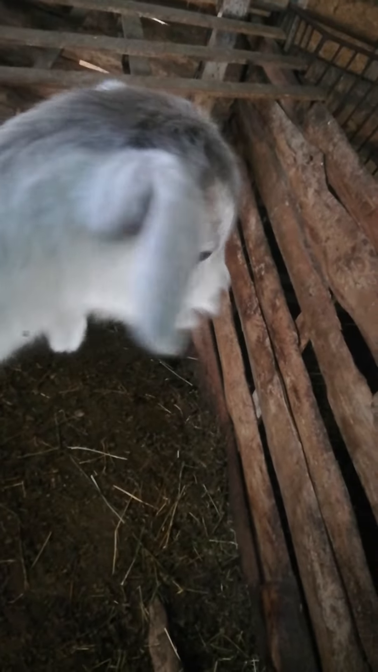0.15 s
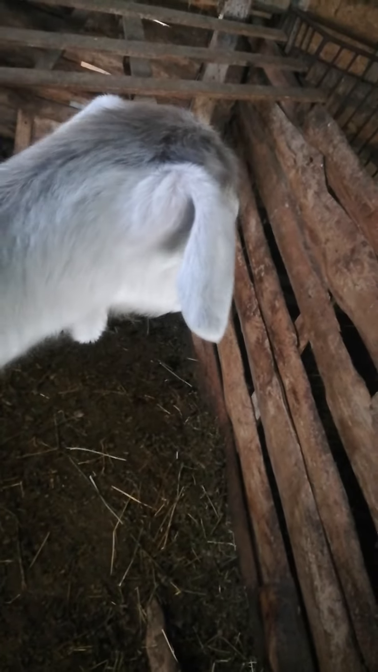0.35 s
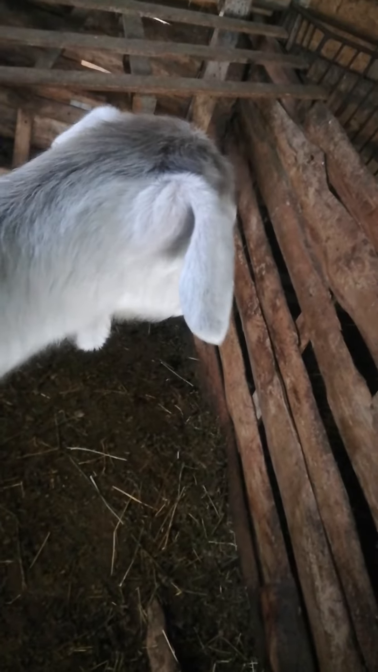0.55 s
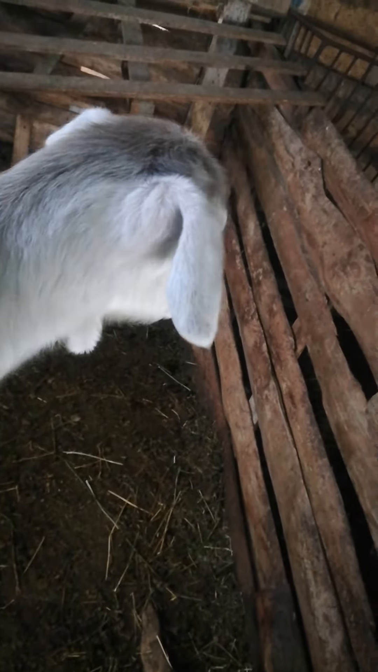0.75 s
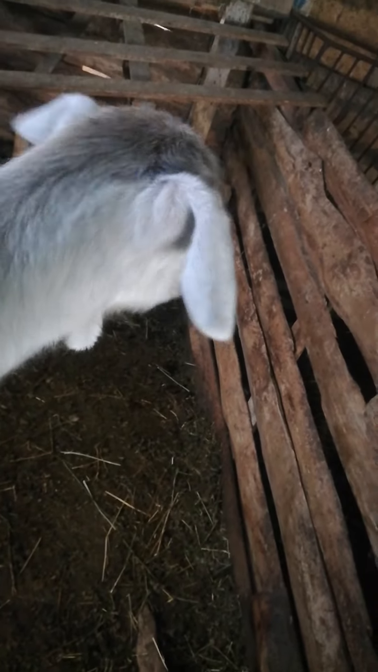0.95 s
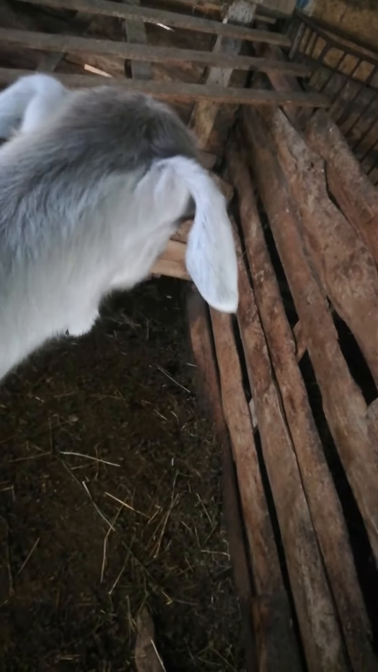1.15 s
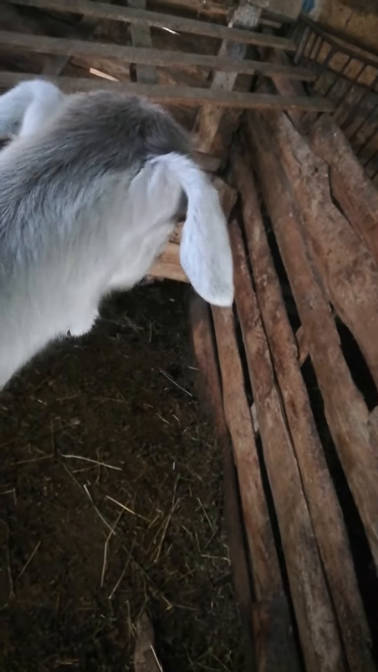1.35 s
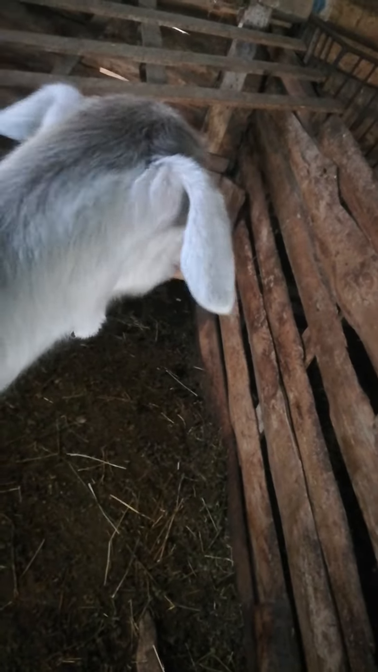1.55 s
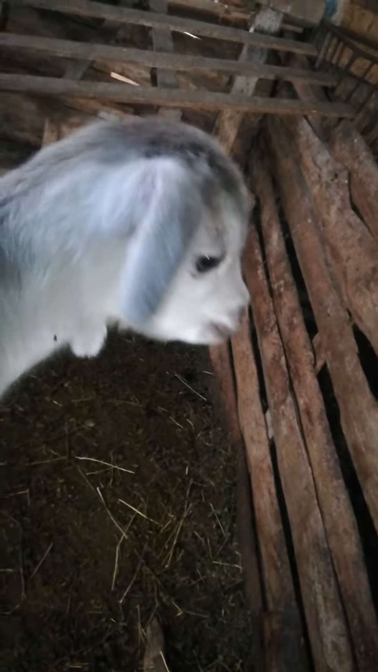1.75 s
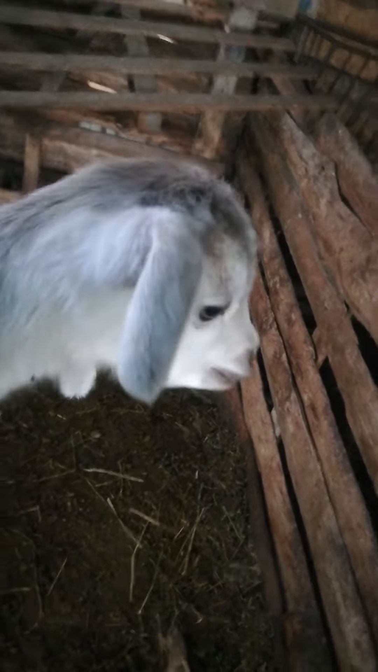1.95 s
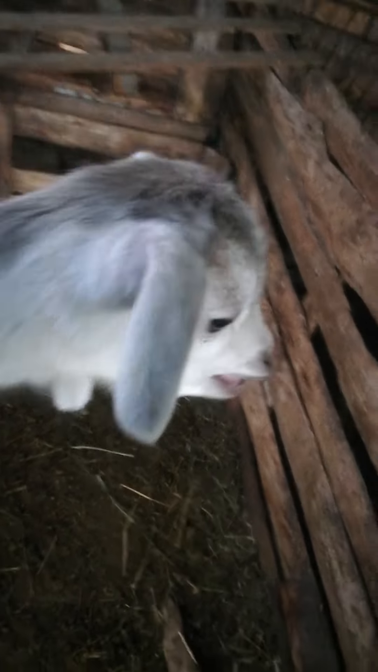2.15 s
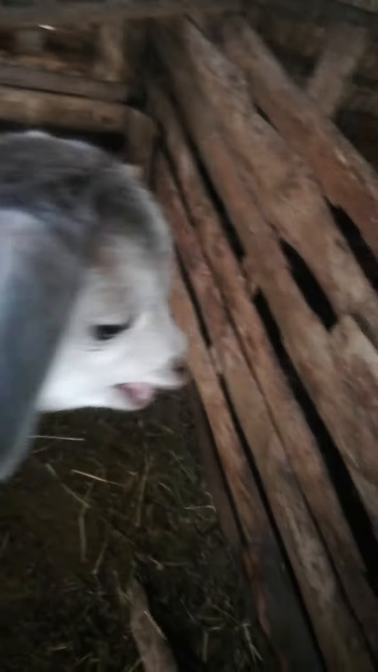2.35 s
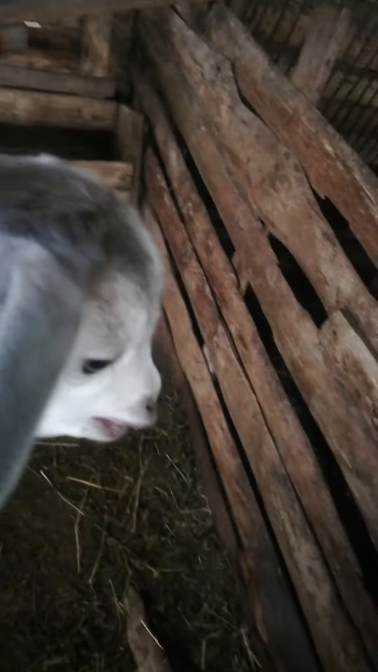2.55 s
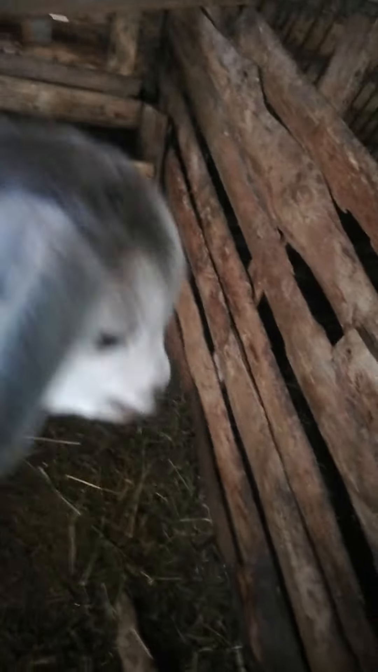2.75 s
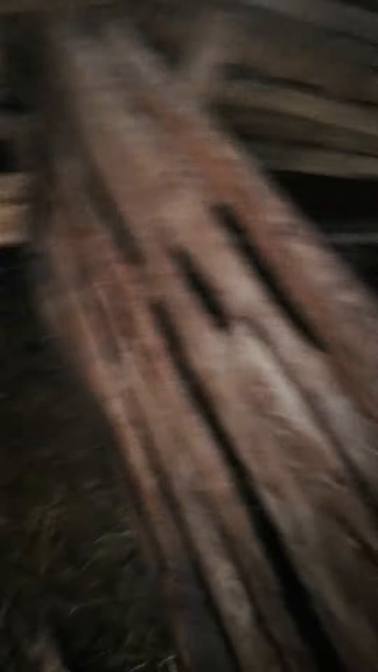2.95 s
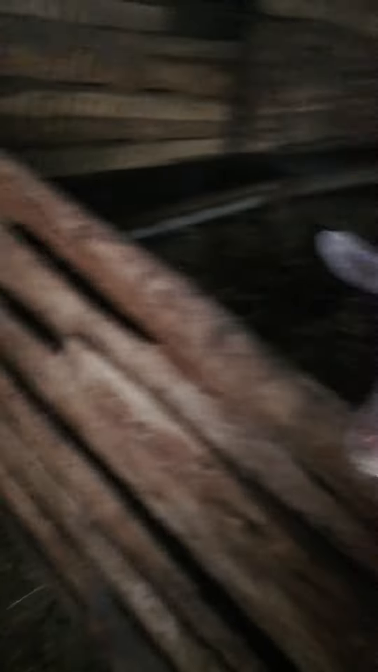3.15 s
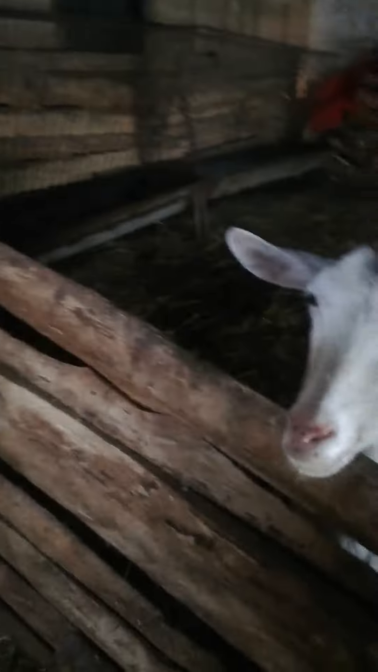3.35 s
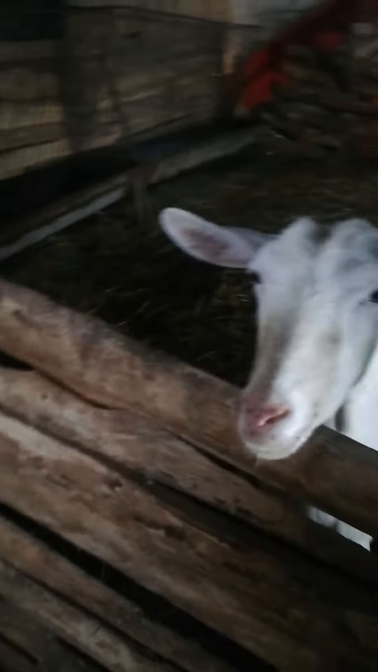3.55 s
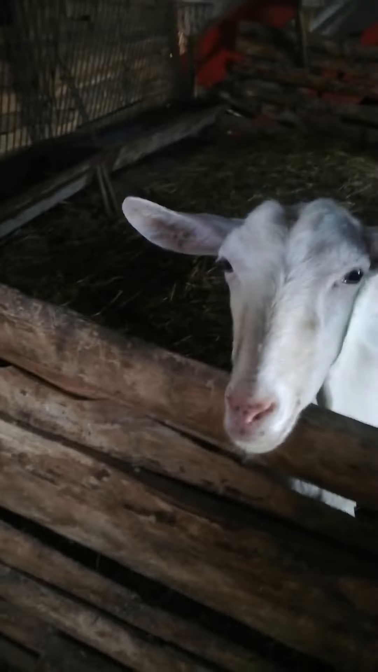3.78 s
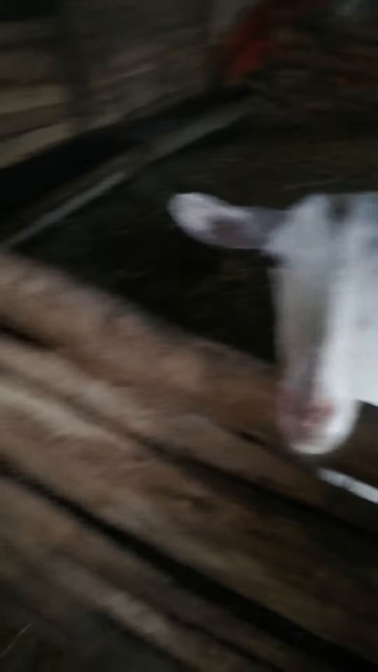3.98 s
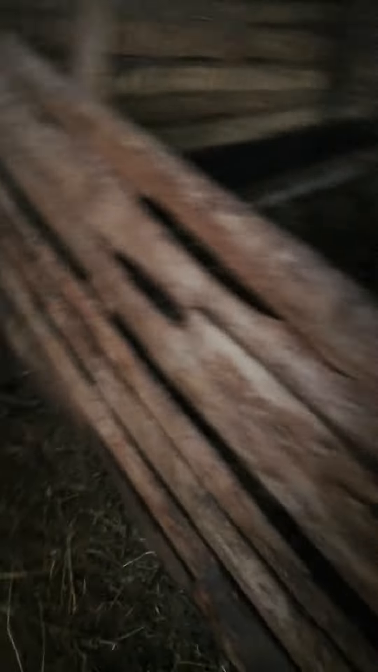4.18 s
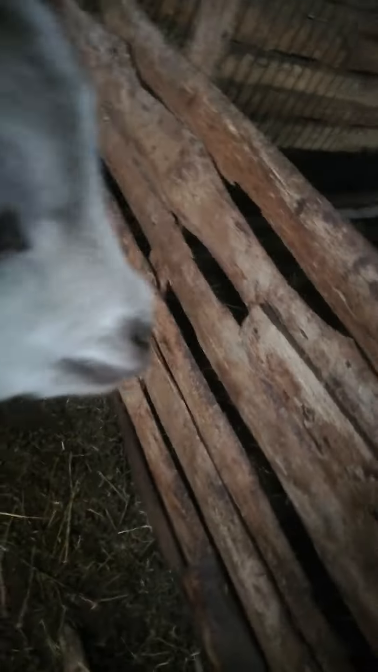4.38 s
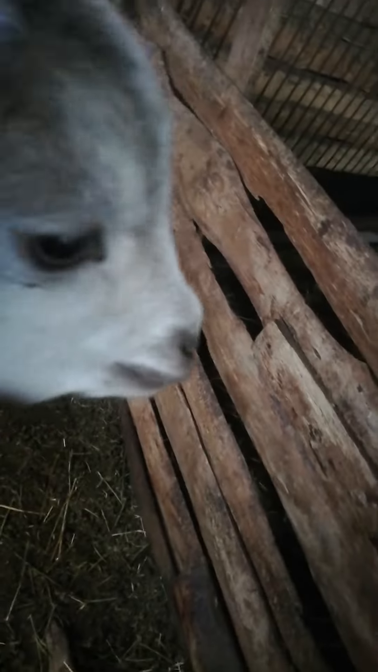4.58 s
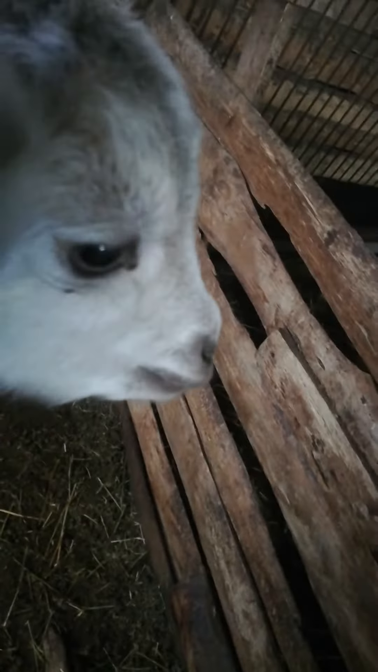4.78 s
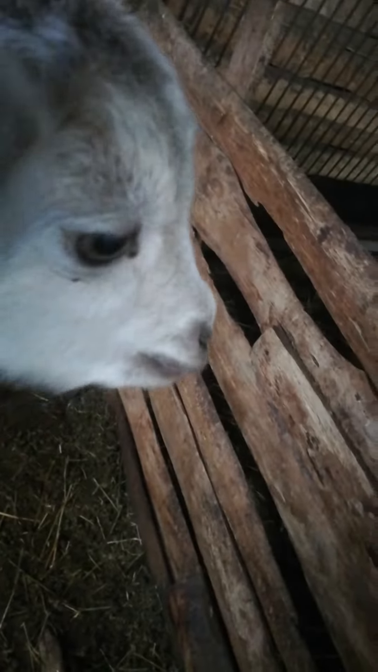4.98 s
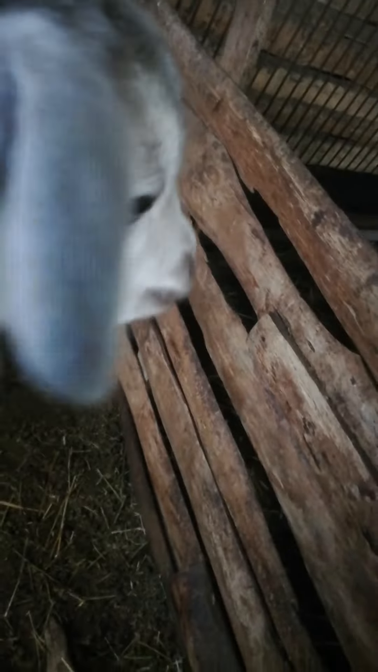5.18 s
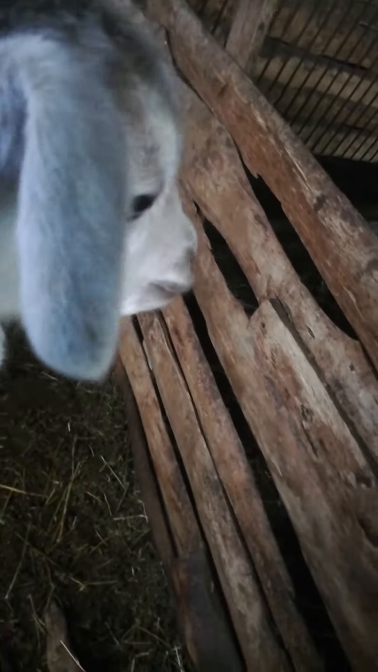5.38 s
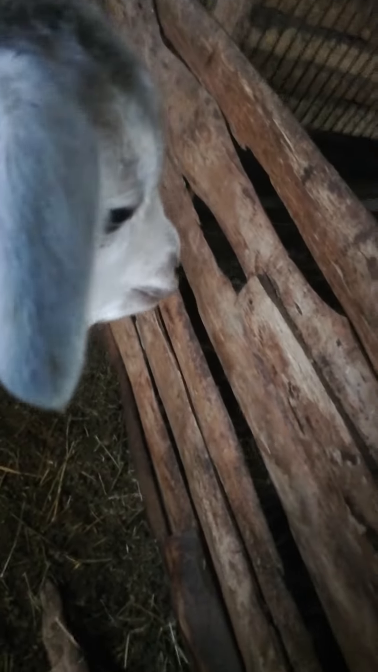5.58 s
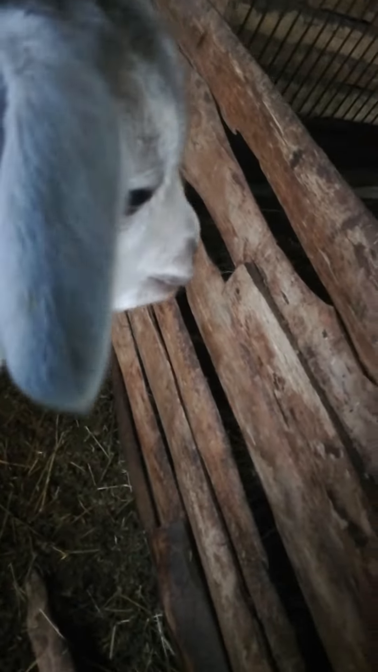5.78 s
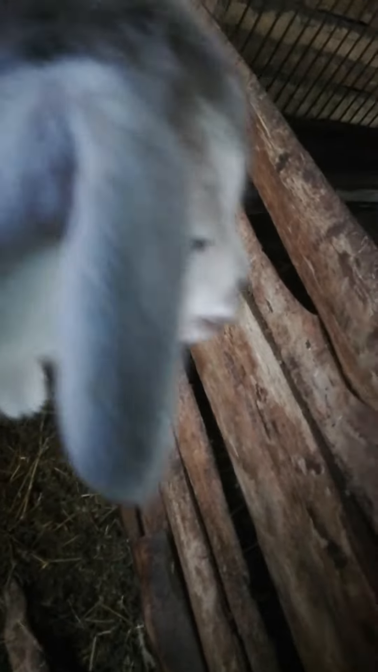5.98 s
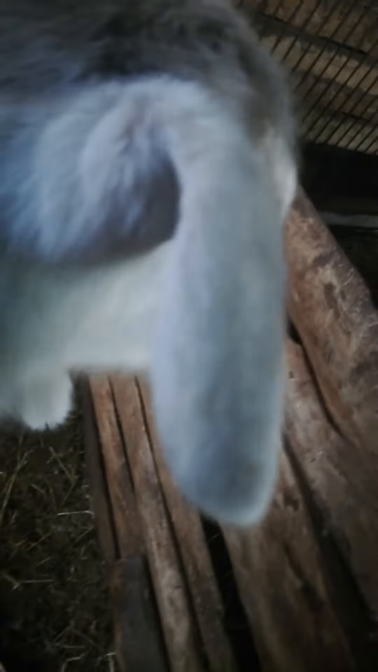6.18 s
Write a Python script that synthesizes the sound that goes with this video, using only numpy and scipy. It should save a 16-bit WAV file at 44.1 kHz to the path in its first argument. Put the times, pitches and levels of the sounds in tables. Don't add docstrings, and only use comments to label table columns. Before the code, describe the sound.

In a wooden pen with a short diffuse echo, picked up by a close stereo microphone, a goat kid starts at once with four quick quavers, 0 to 0.5 s, a medium-high trembling bleat. A soft breath fades after it. From 1.2 to 1.8 s a doe farther away replies with six low, nasal, nearly closed-mouth pulses, quiet and humming, with light straw rustle. At 1.8 to 2.5 s the kid bleats again, louder, brighter and wider open, its last quaver dying away near 2.6 s. A hoof knocks wood, and the doe murmurs four pulses until about 3.05 s amid crisp straw snaps. The kid's third bright bleat runs from 3.25 to 3.95 s. Afterwards come fading breath, gentle air stirs, sparse straw ticks and a faint double hoof step at 6.2 s, over soft hiss and low outdoor rumble.

```python
import sys
import numpy as np
from scipy import signal
from scipy.fft import rfft, irfft
from scipy.io import wavfile
from scipy.ndimage import uniform_filter1d

SR = 44100
rng = np.random.default_rng(int(sys.argv[2]) if len(sys.argv) > 2 else 0)


def master(y):
    cut = np.clip(np.atleast_2d(y).T, -1, 1)
    pcm = np.round(cut * 32767)
    wavfile.write(sys.argv[1], SR, pcm.astype(np.int16))


def natural_amplitude(level_db):
    exponent = np.asarray(level_db, float) / 20
    return 10 ** exponent


N = 274680

# (start [s], rise [s], top pitch [Hz], level [dB], mouth opening [0-1])
DOE_CALLS = [(1.195, 0.044, 206.7, -50, 0.3), (1.32, 0.031, 223.2, -42.5, 0.13),
             (1.435, 0.035, 228.5, -44, 0.095), (1.548, 0.031, 232.7, -42, 0.05),
             (1.658, 0.038, 224.8, -44.5, 0.084), (1.758, 0.035, 216, -54.5, 0.17),
             (2.68, 0.036, 189.9, -44.5, 0.43), (2.8, 0.024, 205.7, -39.5, 0.28),
             (2.905, 0.031, 203, -40, 0.4), (3.003, 0.037, 185.6, -42.5, 0.28),
             (3.15, 0.0057, 191.3, -68.5, 0.37), (3.455, 0.019, 223.8, -61.5, 0.28)]


def at_hz(points, hz):
    point_hz, point_db = np.array(points).T
    return np.interp(np.log(hz), np.log(point_hz), point_db)


def rms_one(x):
    return x / np.sqrt(np.mean(x ** 2) + 1e-20)


def drift(rate):
    r = np.exp(-80 * np.pi * rate / SR)
    white = rng.standard_normal(N // 40 + 2002)
    slow = signal.lfilter([1], [1, -2 * r, r * r], white)[2000:]
    return np.interp(np.arange(N) / 40, np.arange(len(slow)), rms_one(slow))


def band(x, low_hz, high_hz, order=2):
    return signal.sosfilt(signal.butter(order, [low_hz, high_hz], "band", fs=SR, output="sos"), x)


def resonate(x, modes):
    out = 0
    for k, (hz, width, db) in enumerate(modes):
        r = np.exp(-np.pi * width / SR)
        poles = [1, -2 * r * np.cos(2 * np.pi * hz / SR), r * r]
        zeros = [(1 - r * r) / 2, 0, (r * r - 1) / 2]
        out = out + (-1) ** k * natural_amplitude(db) * signal.lfilter(zeros, poles, x)
    return out


def formants(x, modes):
    out = 0
    for k, (hz, width, db) in enumerate(modes):
        mode = [(hz, 1.5 * width, 0)]
        out = out + (-1) ** k * natural_amplitude(db) * resonate(resonate(x, mode), mode)
    return out


def swells(rows):
    t = np.arange(N) / SR
    gain = 0
    for s, rise, fall, db in rows:
        away = np.maximum((s - t) / max(rise, .005), (t - s) / max(fall, .005))
        gain = gain + natural_amplitude(db - 20 * away)
    return gain


def row_at(rows, s):
    return max(np.searchsorted([row[0] for row in rows], s) - 1, 0)


def banded_noise(spectrum, patchy_db):
    # (frequency [Hz], correlation [-1 to 1])
    likeness = [(25, .999), (60, .99), (130, .96), (290, .75), (640, 0), (15000, 0)]
    out, edges = 0, 16 * 2 ** np.arange(0, 10.1, .5)
    white = rng.standard_normal((2, 2, N))
    for k, (low, high) in enumerate(zip(edges, edges[1:])):
        hz = np.sqrt(low * high)
        flicker = drift(2.7)
        if spectrum[0][0] <= hz <= spectrum[-1][0]:
            mid, side = band(white[k % 2], low, high)
            alike = np.clip(at_hz(likeness, hz), -1, 1)
            gain = natural_amplitude(at_hz(spectrum, hz) + patchy_db * flicker)
            out = out + gain * (np.sqrt(1 + alike) * mid + np.sqrt(1 - alike) * side * [[1], [-1]])
    return rms_one(out)


def outdoor_rumble():
    # (frequency [Hz], density [dB per Hz])
    rumble_spectrum = [(12, -39.5), (20, -13), (45, 3), (80, -8.5), (229, -9), (338, -19.5), (400, -34.5),
                       (1100, -110)]
    return natural_amplitude(-58) * banded_noise(rumble_spectrum, patchy_db=3.0)


def air_hiss():
    # (frequency [Hz], density [dB per Hz])
    hiss_spectrum = [(300, -12), (700, 7), (2000, 0.5), (5000, 0), (9000, -4.5), (13000, 1), (16000, -34)]
    return natural_amplitude(-66) * banded_noise(hiss_spectrum, patchy_db=1.85)


def air_swish():
    # (peak [s], rise [s], fall [s], peak level [dB])
    swish_rows = [
        (.52, 0.035, 0.34, -60.5),
        (1.124, .04, 0.033, -71),
        (3.28, 0.28, 0.1, -60),
        (3.98, 0.057, 0.32, -63),
        (4.45, 0.042, 0.043, -70),
        (5.15, 0.37, 0.65, -62),
        (5.81, 0.083, 0.054, -69.5),
        (5.95, .07, .15, -70),
        (6.22, 0.048, .1, -65),
    ]
    quaver_puffs = []
    for s, rise, hz, db, opening in DOE_CALLS:
        quaver_puffs.append((s + rise / 2, 0.0087, 0.093, db - 7.5))
    noise = band(rng.standard_normal((2, N)), 530, 2000, order=1)
    return rms_one(noise) * swells(swish_rows + quaver_puffs) * natural_amplitude(2)


def straw_rustle():
    # (peak [s], rise [s], fall [s], peak level [dB])
    rustle_rows = [(1.34, 0.021, 0.096, -58), (1.76, 0.1, .15, -58), (1.55, .25, .25, -65),
                   (2.7, .08, 0.18, -55.5), (2.958, .05, 0.017, -51), (3.044, 0.088, 0.036, -54.5),
                   (3.28, 0.41, 0.59, -75), (4.05, .15, 0.26, -63), (4.52, 0.016, 0.041, -75),
                   (4.84, 0.13, 0.11, -77), (5.2, 0.25, .3, -75), (5.58, 0.51, 0.56, -65.5),
                   (6.16, .15, .15, -69)]
    t = np.arange(N) / SR
    busy = uniform_filter1d(1. * (t > 1.7) * (t < 3.95), size=4000)
    steady = natural_amplitude(-85) + natural_amplitude(-66) * busy
    sparse_grains = 1 + 2 * (rng.random(N) < .02)
    grains = rng.standard_normal((2, N)) * sparse_grains * natural_amplitude(1.5 * drift(20))
    return rms_one(band(grains, 8000, 11250)) * (steady + swells(rustle_rows)) * natural_amplitude([[2.5], [6.5]])


def nostril_whistle():
    # (peak [s], rise [s], fall [s], peak level [dB])
    whistle_rows = [
        (.53, 0.081, 0.3, -57),
        (1.55, 0.22, 0.4, -63.5),
        (1.79, 0.1, .08, -51.5),
        (2.7, 0.17, 0.17, -55.5),
        (2.85, 0.18, .2, -64.5),
        (3.98, 0.1, 0.47, -60),
    ]
    nostril = [(4850, 450, 0)]
    narrow = resonate(resonate(rng.standard_normal((2, N)), nostril), nostril)
    return rms_one(narrow) * swells(whistle_rows) * natural_amplitude(-4)


def straw_snaps():
    # (time [s], peak level [dB])
    snap_times = [(0.9794, -66.5), (1.3338, -43), (2.685, -30), (2.7177, -34), (2.7307, -35),
                  (2.8447, -29.5), (2.9377, -30.5), (2.9562, -29.5), (3.0076, -29.5), (3.0455, -26.5),
                  (3.062, -40), (4.1724, -52), (4.5135, -57), (5.4784, -50.5), (5.6446, -45)]
    snaps = np.zeros(N)
    for s, db in snap_times:
        i = round(s * SR)
        snaps[i:i + 400] += natural_amplitude(db + 2) * rng.standard_normal(400) * np.exp(-np.arange(400) / 90)
    return band(snaps, 12000, 13000) * natural_amplitude([[-5], [3]])


def hooves():
    # (time [s], peak level [dB], plank mode [Hz])
    knock_rows = [
        (2.634, -39, 1180),
        (6.197, -58, 943),
        (6.218, -56, 1010),
    ]
    out, t = np.zeros(N), np.arange(1800) / SR
    for s, db, hz in knock_rows:
        i = round(s * SR)
        envelope = np.exp(-t / 0.01) * (1 - np.exp(-t / 0.0011))
        knock = natural_amplitude(db) * np.sin(2 * np.pi * hz * t) * envelope
        out[i:i + len(t)] += knock[:N - i]
    return out


def pen(x):
    t60 = 0.29
    t = np.arange(round(.6 * SR)) / SR
    noise = rng.standard_normal((2, len(t)))
    dull = signal.lfilter(*signal.butter(1, 3000, fs=SR), noise)
    tail = dull * natural_amplitude(-60 * t / t60) + .45 * (noise - dull) * natural_amplitude(-60 * t / (.55 * t60))
    tail = natural_amplitude(-12) * tail * np.clip(t / .008, 0, 1) / np.sqrt(np.sum(tail ** 2) / 2)
    return signal.fftconvolve(x.mean(axis=0, keepdims=True), band(tail, 570, 12000))[:, :N]


def ducking(x):
    power = uniform_filter1d(np.mean(x ** 2, axis=0), size=round(.12 * SR))
    level_db = 10 * np.log10(power.clip(1e-12))
    return natural_amplitude(-.35 * np.maximum(level_db + 36, 0))


def place(x, lag_ms, pan_db):
    lag = lag_ms * SR / 2000
    spectrum, turns = rfft(x), np.arange(len(x) // 2 + 1) / len(x)
    sides = []
    for way in (1, -1):
        shifted = spectrum * np.exp(-2j * np.pi * turns * lag * way)
        sides.append(natural_amplitude(way * pan_db / 2) * irfft(shifted, len(x)))
    return np.array(sides)


def scattered(x):
    taps = rng.standard_normal((2, 260)) * np.exp(-np.arange(260) / 60)
    taps = natural_amplitude(-3.5) * taps / np.sqrt(np.sum(taps ** 2, axis=1, keepdims=True))
    return x + signal.fftconvolve(x, taps, axes=1)[:, :x.shape[1]]


def swell(t, peak, end, start_db, end_db, bend):
    rising = start_db * np.clip(1 - t / peak, 0, 1) ** bend
    falling = end_db * np.clip((t - peak) / (end - peak), 0, 1) ** bend
    return natural_amplitude(rising + falling) * np.clip(t / .002, 0, 1) * np.clip((end + .003 - t) / .012, 0, 1)


def quaver(timing, strength, rough, mouth_width, throat, edge, shape, nasal):
    peak, end, top_hz, start_hz, mouth_hz = timing
    chest_db, mouth_db, throat_db, edge_db = strength
    sag, low_start_db, low_end_db, lead, bright_start_db, bright_end_db = shape
    rough = rough * (1 + np.clip((-43 - max(strength)) / 6, 0, 2))
    t = np.arange(round((end + .03) * SR)) / SR
    jitter, shimmer = rng.standard_normal((2, 64))
    breath = rng.standard_normal(len(t))

    pitch = top_hz - (top_hz - start_hz) * np.clip(1 - t / (.95 * peak), 0, 1) ** 1.9
    pitch = pitch * (1 - sag * np.clip((t - peak) / (end - peak), 0, 1) ** 2.6)
    cycles = np.cumsum(pitch) / SR
    cycles = cycles + .045 * rough * np.interp(cycles, np.arange(64), jitter) - .5
    nearest = np.clip(np.round(cycles).astype(int), 0, 63)

    multiples = np.arange(1, int(15000 / top_hz))[:, None]
    pulses = rms_one(np.cos(2 * np.pi * multiples * cycles).sum(axis=0))
    uneven = pulses * natural_amplitude(6 * rough * shimmer[nearest])
    puffs = 2 * breath * (.1 + np.cos(np.pi * cycles - .5) ** 4)
    windy = rough * (1.2 + 2.5 * np.clip(t / end, 0, 1) ** 3)

    body = swell(t, peak, end, low_start_db, low_end_db, bend=1.31)
    crisp = swell(t, lead * peak, end, bright_start_db, bright_end_db, bend=1.71)
    fundamental = np.sqrt(2) * np.cos(2 * np.pi * cycles - 1)
    chest = body * natural_amplitude(chest_db) * fundamental

    mouth = resonate(pulses + 0.19 * windy * puffs, [(mouth_hz, mouth_width, 0)])
    mouth = band(mouth, 1.5 * top_hz, 1.6 * mouth_hz)
    low = (crisp if nasal else body) * natural_amplitude(mouth_db) * rms_one(mouth)

    middle = rms_one(formants(pulses + 0.87 * windy * puffs, throat))
    source = uneven + windy * puffs
    lips = natural_amplitude(-6 * np.clip(1 - t / peak, 0, 1) ** 2)
    wide, narrow = formants(source, edge[:3]), formants(source, edge[3:])
    top = rms_one(band(lips * wide - narrow / lips, 3500, edge[-1][0] + 700, order=5))
    throaty = crisp if nasal else np.sqrt(crisp * body)
    return chest, low, throaty * natural_amplitude(throat_db) * middle + crisp * natural_amplitude(edge_db) * top


def goat(quavers, voices, law, postures, roughs, throats, edges, shape, nasal):
    # (from [s], to [s])
    eased_spans = [
        (1.8, 1.9),
        (2.05, 2.15),
        (3.5, 3.6),
    ]
    out = np.zeros((2, N))
    climb, low_slope_db, mouth_slope_db, edge_slope_db = law
    for start, rise, hz, db, opening in quavers:
        k = row_at(postures, start)
        _, lag_ms, low_pan_db, high_pan_db, width = postures[k]
        _, release, low_db, mouth_db, edge_db = voices[row_at(voices, start)]
        mouth_hz = 600 + 800 * np.clip(opening, 0, 1.1)
        start_hz = hz * (1 - climb * rise * (440 / hz) ** 1.2)
        timing = rise, rise + release, hz, start_hz, mouth_hz
        wider = opening - .6
        strength = (db + low_db + low_slope_db * wider, db + mouth_db + mouth_slope_db * wider,
                    db, db + edge_db + edge_slope_db * wider)
        eased_db = -9 * any(a < start < b for a, b in eased_spans)
        onset = np.add(shape, [0, eased_db, 0, 0, eased_db, 0])
        chest, low, bright = quaver(timing, strength, roughs[k], width, throats[k], edges[k], onset, nasal)
        chest_pan_db = low_pan_db - 2 * (not nasal)
        i = round(start * SR)
        here = out[:, i:i + len(low)]
        here += place(chest, lag_ms, chest_pan_db)
        here += place(low, lag_ms, low_pan_db)
        here += scattered(place(bright, lag_ms, high_pan_db))
    return out


def doe_calls():
    # (from [s], left lag [ms], L-R low [dB], L-R high [dB], mouth width [Hz])
    posture_rows = [
        (.9, 0.029, -2.5, 1, 496),
        (2.6, .11, -1.5, -5.5, 480),
    ]
    rough_rows = [.48, .28]
    # (frequency [Hz], width [Hz], level [dB])
    throat_modes = [
        [(2030, 190, -14), (3240, 860, -4), (4106, 330, -2), (4700, 820, -8.5)],
        [(2130, 390, -19.5), (3230, 480, -10.5), (4300, 590, -16), (5360, 480, -20)],
    ]
    edge_modes = [
        [(6660, 370, 19), (8200, 680, 10), (9200, 1200, 7), (11500, 1500, 15.5), (14470, 1500, -12.5)],
        [(6440, 780, -1), (7700, 330, 0), (9400, 700, -1), (11010, 1600, 0), (13820, 1500, -14)],
    ]
    # (from [s], release [s], fundamental [dB], mouth [dB], edge [dB])
    voice_rows = [
        (1, .034, 1.5, -11, -26),
        (2.6, 0.025, -9, -10, -5),
        (2.75, 0.031, 0.5, -12.5, -9),
        (3.1, 0.019, 23, 9.5, -5),
        (3.4, 0.038, 8, -20, 15),
    ]
    # (pitch climb [share per s of rise], fundamental [dB], mouth [dB], edge [dB])
    effort_law = (0.11, -.1, .1, .1)
    # (pitch sag [share], low start [dB], low end [dB], bright peak [share], bright start [dB], bright end [dB])
    quaver_shape = (.05, -16, -20, .55, -7, -16)
    return goat(DOE_CALLS, voice_rows, effort_law, posture_rows, rough_rows, throat_modes, edge_modes,
                quaver_shape, nasal=True)


def kid_calls():
    # (start [s], rise [s], top pitch [Hz], level [dB], mouth opening [0-1])
    quaver_rows = [(0.012, 0.017, 358, -40, 0.55), (0.132, 0.036, 405, -37.5, 0.42),
                   (0.275, 0.043, 406.7, -37, 0.44), (0.429, 0.047, 384, -38, 0.49),
                   (1.842, .04, 376.2, -41, 0.51), (1.96, 0.027, 456, -35, 0.37),
                   (2.058, .038, 471, -33, 0.54), (2.178, 0.044, 449.4, -30, 0.82),
                   (2.295, 0.044, 460, -29, 1), (2.427, .043, 450.5, -29.5, 1),
                   (2.59, .018, 228, -43.5, 0.85), (3.25, 0.012, 373, -50.5, 0.2),
                   (3.31, .035, 448.3, -31, 0.44), (3.425, .03, 457.3, -27, .47),
                   (3.515, .057, 452.3, -31.5, 0.67), (3.662, 0.042, 445.7, -30.5, 0.74),
                   (3.802, 0.032, 442, -29.5, 0.73), (3.915, 0.03, 314.3, -46, 0.87)]
    # (from [s], left lag [ms], L-R low [dB], L-R high [dB], mouth width [Hz])
    posture_rows = [
        (0, -.11, -4, -1, 650),
        (1.9, -0.069, 0.5, -4.5, 600),
        (2.05, -0.052, 1.45, -8.5, 224.6),
        (3.2, .06, -7.5, -6, 700),
        (3.5, 0.1, -1, -9, 386.6),
    ]
    rough_rows = [.4, .27, .22, .25, .2]
    # (frequency [Hz], width [Hz], level [dB])
    throat_modes = [
        [(2143, 380, 6), (3620, 830, -3)],
        [(2300, 530, -2.5), (3370, 500, -4.5)],
        [(2530, 730, 9.5), (3680, 250, 2)],
        [(2270, 510, -9), (3640, 1100, -10)],
        [(2440, 385, 9.5), (3686, 420, 7)],
    ]
    edge_modes = [
        [(4360, 360, -10.5), (6020, 1000, -3), (7650, 470, -4), (8700, 600, -5.5), (10810, 1100, -11.5)],
        [(4960, 920, 1), (6690, 320, 3.5), (7750, 600, 9), (9300, 1900, 0.5), (11200, 530, -12)],
        [(4793, 910, -8.5), (6345, 480, -2), (6840, 730, -3), (9240, 2700, -18), (12200, 1100, -59)],
        [(5440, 1100, -11.5), (7070, 600, -17), (7440, 160, -1), (8680, 740, -9.5), (11000, 500, -24)],
        [(4940, 600, 4), (6260, 450, 8.5), (7200, 1080, 9), (9080, 530, 2), (10260, 2500, -7.5)],
    ]
    # (from [s], release [s], fundamental [dB], mouth [dB], edge [dB])
    voice_rows = [
        (0, 0.04, -4.5, 5, -3),
        (1.8, 0.047, -7.5, 2, 0.5),
        (1.9, 0.078, -12.5, 2, 0.5),
        (2.05, 0.049, -11, 4, 7.5),
        (2.55, 0.055, -19, -4, 6),
        (3.2, 0.033, -20.5, -11.5, -2.5),
        (3.5, 0.035, -14, 2.5, 8.5),
        (3.9, .027, -30, -5.5, -3),
    ]
    # (pitch climb [share per s of rise], fundamental [dB], mouth [dB], edge [dB])
    effort_law = (6, -26, 17.5, -2)
    # (pitch sag [share], low start [dB], low end [dB], bright peak [share], bright start [dB], bright end [dB])
    quaver_shape = (0.6, -23.5, -56, 1.2464, -10, -30.5)
    return goat(quaver_rows, voice_rows, effort_law, posture_rows, rough_rows, throat_modes, edge_modes,
                quaver_shape, nasal=False)


def scene():
    background = outdoor_rumble() + air_hiss()
    near = air_swish() + straw_rustle() + nostril_whistle() + straw_snaps() + hooves()
    doe = doe_calls()
    kid = kid_calls()
    echo = pen(kid + 2.2 * doe)
    return ducking(kid) * background + near + echo + doe + kid


def band_limit(x):
    return signal.sosfilt(signal.butter(12, 15780, fs=SR, output="sos"), x)


def record(dry):
    left = signal.sosfilt(signal.butter(2, 8500, fs=SR, output="sos"), dry[0])
    return band_limit(np.array([left, dry[1]]))


dry = scene()
out = record(dry)
master(out)
```